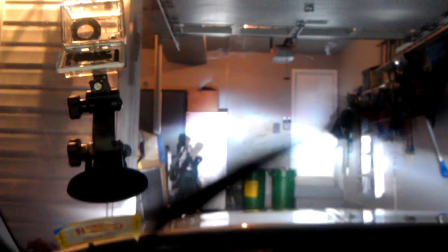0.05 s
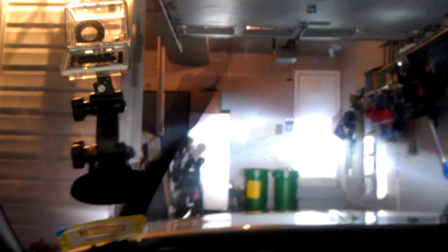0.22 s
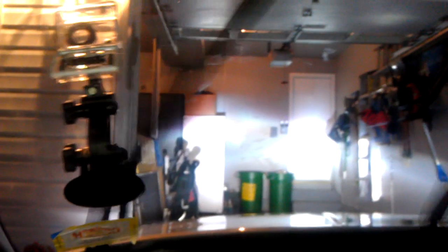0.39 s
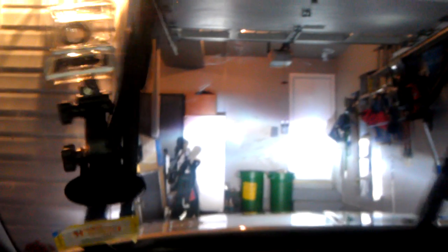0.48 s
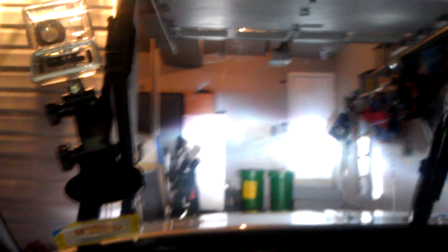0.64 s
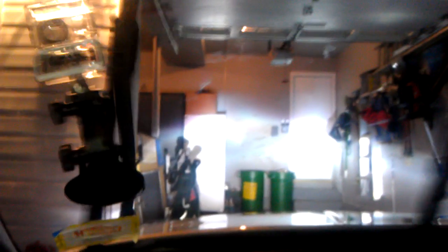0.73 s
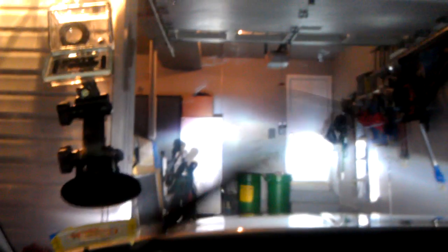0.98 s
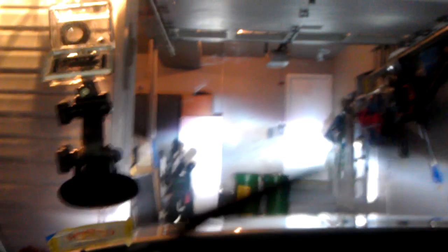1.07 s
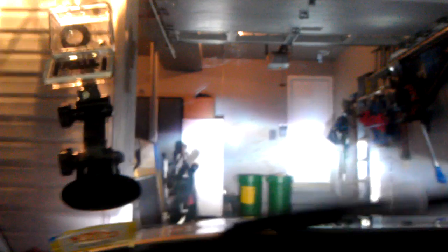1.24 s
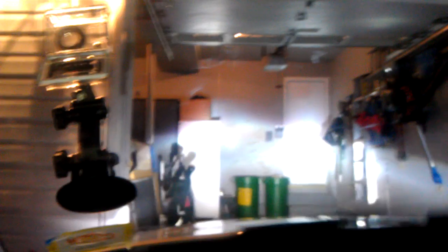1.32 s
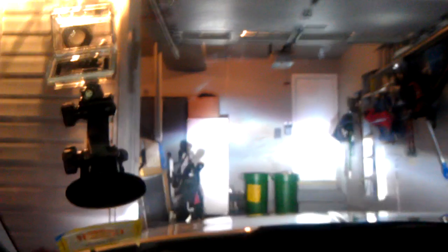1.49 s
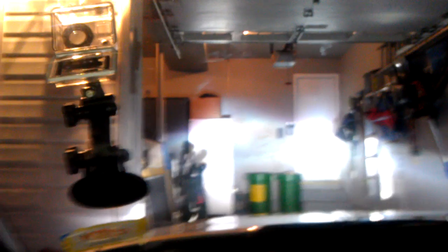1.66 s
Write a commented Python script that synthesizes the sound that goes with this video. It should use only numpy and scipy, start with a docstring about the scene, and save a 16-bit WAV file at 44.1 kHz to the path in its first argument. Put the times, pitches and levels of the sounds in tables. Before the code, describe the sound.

Wiper blade scraping and thumping up and back over a nearly dry windscreen, from inside.

```python
"""Inside a parked car, a windscreen wiper sweeps up and back over nearly dry glass.
The rubber blade catches, judders and scrapes; each slip knocks the screen and booms in the cabin.
The end of the return is smooth: the motor whines over a faint hiss, speeding up until the arm
parks with a soft tap."""
import sys
import numpy as np
from scipy import signal
from scipy.fft import rfft, irfft
from scipy.io import wavfile
from scipy.ndimage import uniform_filter1d

SR = 44100
rng = np.random.default_rng(int(sys.argv[2]) if len(sys.argv) > 2 else 0)


def unload_wav(signal):
    """Save mono or channel-first audio to the path in sys.argv[1] as 16-bit WAV at rate SR, clipped to [-1, 1]."""
    wavfile.write(
        sys.argv[1],
        SR,
        np.round(np.clip(np.atleast_2d(signal).T, -1, 1) * 32767).astype(np.int16),
    )


N = 74970
TIME = np.arange(N) / SR


def amp(db):
    """Decibels to gain."""
    return 10 ** (np.asarray(db) / 20)


def unit(x):
    """Scales to rms 1."""
    return x / np.sqrt(np.mean(x ** 2) + 1e-20)


def read(points, hz):
    """Reads a curve on a log-frequency axis."""
    f, value = np.transpose(points)
    return np.interp(np.log(hz + 1), np.log(f + 1), value)


def add(mix, start_s, sound):
    """Drops a sound into the mix."""
    part = mix[max(round(start_s * SR), 0):][:len(sound)]
    part += sound[:len(part)]


def colour(x, eq):
    """EQs a steady sound, at rms 1."""
    hz = np.fft.rfftfreq(len(x), 1 / SR)
    return unit(irfft(rfft(x) * amp(read(eq, hz)), len(x)))


def wander(length, size):
    """Slow random drift at rms 1."""
    return unit(uniform_filter1d(uniform_filter1d(rng.standard_normal(length), size), size))


# Hiss of the still cabin: freq_hz, gain_db
HISS_EQ = [(15, -18), (25, -21), (76, -7.5), (127, -5), (503, -23.5), (1130, -14.5), (2110, -19),
           (2410, -16), (3520, -20.5), (14400, -18), (16000, -20.5)]
# Electrical tones: pitch_hz, level_db
ELECTRIC_TONES = [(13999, -79), (14883, -76)]


def background():
    """A bed of steady hiss with two very faint, wavering electrical tones."""
    tones = 0
    for pitch_hz, level_db in ELECTRIC_TONES:
        hz = pitch_hz + 3.99 * wander(N, size=400)
        tones += amp(level_db) * np.sqrt(2) * np.sin(2 * np.pi * np.cumsum(hz) / SR)
    return amp(-63.5) * colour(rng.standard_normal(N), HISS_EQ) + tones


# Motor speed and fader: time_s, shaft_hz, gain_db
MOTOR_MOVES = [(0, 52, -51), (.1, 49, -58), (.45, 44, -58), (.62, 46, -53), (.95, 46, -50), (1.1, 52, -56),
               (1.24, 51.3, -55.5), (1.34, 52.7, -52), (1.43, 58, -61), (1.48, 55, -57.5),
               (1.52, 47, -71.5), (1.7, 40, -76.5)]
# Partials of the whine: shaft_multiple, peak_gain_db, peak_shaft_hz, half_width_hz
WHINE_ORDERS = [(2, -15, 49, 3.5), (3, -1.5, 55.25, 2), (4, -12, 24, 4), (7, -22, 54, 1.3),
                (8, -3.5, 58, 3), (16, -16.5, 51.4, 1.4)]
# Rumble of gears and linkage: freq_hz, gain_db
RUMBLE_EQ = [(30, -64), (90, -5.5), (140, -5), (178, 3.5), (240, -4.5), (400, -9.5), (550, -19),
             (1200, -26), (4000, -25), (16000, -55.5)]


def motor():
    """Shaft harmonics swell as the speed sweeps them through resonances, over the gear rumble."""
    time_s, shaft_hz, gain_db = np.transpose(MOTOR_MOVES)
    speed = np.interp(TIME, time_s, shaft_hz)
    wobble = 1 + 0.0069 * wander(N, size=900)
    turn = 2 * np.pi * np.cumsum(speed * wobble) / SR
    whine = 0
    for multiple, peak_db, peak_hz, half_width_hz in WHINE_ORDERS:
        swell = amp(peak_db) / (1 + ((speed - peak_hz) / half_width_hz) ** 2)
        whine += swell * np.sqrt(2) * np.sin(multiple * turn + 2 * np.pi * rng.random())
    rumble = amp(-5) * colour(rng.standard_normal(N), RUMBLE_EQ)
    return amp(np.interp(TIME, time_s, gain_db)) * (whine + rumble)


# Fader ride of the scrape: time_s, level_db
SCRAPE_FADER = [(0, -59), (.19, -62), (.29, -59), (.315, -41.5), (.34, -48.5), (.365, -31.5), (.40, -32),
                (.45, -52.5), (.49, -59), (.65, -65.5), (.675, -54), (.755, -54.5), (.775, -42.5),
                (.85, -34.5), (.90, -72.5), (1.1, -63), (1.42, -63), (1.52, -70)]
# Tone of rubber on glass: freq_hz, gain_db
SCRAPE_EQ = [(40, -20.5), (150, 10.5), (500, 7.5), (1100, 5.5), (1800, 2.5), (3000, 0), (4500, -7.5),
             (7000, -13), (9000, -66.5), (16000, -39.5)]


def scrape(grains_per_s=900):
    """Tiny slips of rubber on glass make a grit, blended with smooth friction noise."""
    grains = (rng.random(N) < grains_per_s / SR) * rng.choice([-1, 1], N)
    grains = grains * amp(-2.5 * np.minimum(rng.exponential(1, N), 4))
    rub = colour(unit(grains) + 0.46 * rng.standard_normal(N), SCRAPE_EQ)
    return rub * amp(np.interp(TIME, *np.transpose(SCRAPE_FADER)))


def snap(t, attack_s=.0008, decay_s=.0025):
    """The rubber lets go: a noise transient, evened out so its spectrum has no deep holes."""
    envelope = np.minimum(t / attack_s, 1) * np.exp(-t / decay_s)
    burst = rng.standard_normal(len(t)) * envelope
    for _ in range(2):
        spectrum = rfft(burst)
        burst = irfft(spectrum / (abs(spectrum) + 1e-12), len(t)) * np.sqrt(envelope)
    return unit(burst) * np.sqrt(np.mean(envelope ** 2))


# Reverb time of the cabin: freq_hz, t60_s
CABIN_DECAY = [(100, 0.4), (260, 0.12), (700, 0.12), (1840, 0.095), (4850, 0.11), (14000, 0.15)]


def cabin_tail(t, attack_s=.0013):
    """A slip scatters round the cabin as noise, the bass lasting longest."""
    hz, time_s, bands = signal.stft(rng.standard_normal(len(t)), SR, nperseg=256)
    decay = 1000 ** (-time_s / read(CABIN_DECAY, hz)[:, None])
    return signal.istft(bands * decay, SR)[1][:len(t)] * (1 - np.exp(-t / attack_s))


# Centres of a knock's thud, body, clack and tick: freq_hz
BAND_HZ = [170, 480, 1300, 4000]
# Resonances of the screen and cabin: pitch_hz, gain_db, t60_s
SCREEN_MODES = [(100, -13.5, 0.21), (129, -34.5, .17), (153, -11, 0.18), (196, 0, 0.2), (207, 4, 0.12),
                (275, -5, 0.11), (316, -1.5, 0.12), (367.9, -11.5, 0.19), (424.6, -0.5, 0.15),
                (550.5, 0.5, 0.11), (586.5, -14.5, 0.28), (690.6, -5, .09), (865, -1.5, 0.069),
                (1236, -3.5, 0.065)]
# Resonances of the blade's steel spine and plastic clips: pitch_hz, gain_db
SPINE_MODES = [(985, -9), (1140, -15.5), (1520, -11.5), (1780, -13.5), (1915, -3.5), (2120, -9),
               (2450, -14.5), (3090, -4), (3480, -6.5), (4030, -29)]


def ring(t, hz, force_db, attack_s=.0027, spine_t60_s=.055):
    """Screen, cabin and spine ring, each mode as hard as the slip drives its pitch."""
    modes = list(SCREEN_MODES) + [(f, db, spine_t60_s) for f, db in SPINE_MODES]
    out = 0
    for pitch_hz, gain_db, t60_s in modes:
        drive = amp(gain_db + np.interp(pitch_hz, hz, force_db))
        out += drive * 1000 ** (-t / t60_s) * np.sin(2 * np.pi * pitch_hz * t)
    return out * (1 - np.exp(-t / attack_s))


def hit_eq(x, db):
    """Minimum-phase EQ, one gain per bin: nothing sounds ahead of the attack."""
    log_gain = np.log(amp(np.maximum(np.r_[db, db[-2:0:-1]], -120)))
    response = np.exp(np.conj(signal.hilbert(log_gain)))[:len(db)]
    return irfft(rfft(x, len(log_gain)) * response)


# Tone of the snap and its tail: freq_hz, gain_db
SCATTER_EQ = [(40, -20), (150, 7.5), (300, 6.5), (550, 0.5), (950, -2.5), (1500, -8), (2400, -11.5),
              (3200, -14.5), (5000, -16), (8000, -20.5), (12000, -19.5), (16000, -25.5)]


def knock(bands_db, size=16384):
    """One slip hits the screen: a snap, a cabin tail and ringing modes."""
    t, hz = np.arange(size) / SR, np.fft.rfftfreq(size, 1 / SR)
    thud_hz, body_hz, _, tick_hz = BAND_HZ
    force_db = read(list(zip(BAND_HZ, bands_db)), hz)
    low_cut_db = 8.5 * np.maximum(np.log2(thud_hz / (hz + 10)) - 1, 0)
    high_cut_db = 12 * np.log2(np.clip(hz, tick_hz, 8600) / tick_hz)
    scatter_db = read(SCATTER_EQ, hz) + 10 * np.log10(SR / 2 / body_hz)
    noise = snap(t) + amp(-9.5) * cabin_tail(t)
    spot_db = 2.5 * wander(len(hz), size=48)  # each spot on the glass has its own colour
    noise = hit_eq(noise, force_db - low_cut_db - high_cut_db + scatter_db + spot_db)
    return noise + amp(-5.5) * ring(t, hz, force_db)


def twang(pitch_hz, gain_db, attack_cycles=.66):
    """The bent rubber and its spine ring for a few cycles; higher is shorter."""
    t = np.arange(0, .15, 1 / SR)
    decay_s = .0063 * (BAND_HZ[1] / pitch_hz) ** .56
    envelope = (1 - np.exp(-pitch_hz * t / attack_cycles)) * np.exp(-t / decay_s)
    return amp(gain_db) * envelope * np.sin(2 * np.pi * pitch_hz * t)


# Slips and slaps of the blade, ending on the parking tap:
# start_s, thud_db, body_db, clack_db, tick_db, twang_hz, twang_db
SLIP_CUES = [(0.2053, -29, -28.5, -34.5, -22.5, 3100, -18.5),
             (0.2080, -27.5, -27.5, -21.5, -19.5, 815, -17.5), (0.213, -25, -21, -32, -33.5, 245, -16.5),
             (0.226, -23, -30, -28.5, -35.5, 115.4, -21), (0.2953, -30.5, -35.5, -35, -36, 985, -25.5),
             (0.309, -31, -35.5, -59.5, -56.5, 240, -35.5), (0.3425, -26.5, -25.5, -20.5, -36.5, 274, -18),
             (0.3573, -37, -29.5, -23, -46, 1170, -31), (0.3669, -16, -24, -13.5, -26.5, 873, -11.5),
             (0.374, -16.5, -16, -10.5, -27.5, 287, -6.5), (0.38, -17.5, -7.5, -20, -30, 450, -14.5),
             (0.3882, -17, -16, -6.5, -27.5, 550, -4.5), (0.3970, -18, -15, -23, -43, 393, -9),
             (0.4119, -17, -33, -23.5, -59, 177, -11), (0.4330, -42.5, -38.5, -52.5, -56.5, 122, -25),
             (0.497, -46.5, -45, -45, -63, 980, -44.5), (0.5530, -35, -27, -36, -43.5, 1220, -29),
             (0.6604, -30, -45.5, -34, -48.5, 384, -27), (0.6636, -28, -40.5, -33, -45.5, 1880, -32.5),
             (0.6992, -61.5, -36, -37, -44.5, 570, -41), (0.7098, -42, -44, -39.5, -41, 1060, -51),
             (0.7374, -33, -36, -37, -43.5, 2050, -38), (0.7613, -20, -21.5, -21, -29, 157, -11),
             (0.7648, -26.5, -26, -37.5, -47, 290, -18.5), (0.7824, -27, -27, -30, -40.5, 2600, -28.5),
             (0.7907, -25, -23.5, -36.5, -39.5, 310, -18.5), (0.8335, -18, -18.5, -15, -19, 2320, -15.5),
             (0.8350, -22, -21, -21, -23.5, 503, -6.5), (0.8380, -25, -25.5, -40, -49.5, 165.7, -11.5),
             (0.85, -36, -20, -40, -42, 407, -6), (0.9450, -42, -51.5, -83, -69, 105, -41.5),
             (1.032, -53.5, -53, -50.5, -46.5, 805, -50), (1.4600, -58, -52, -49.5, -55, 1050, -56)]


def slips():
    """The blade catches and lets go, with a knock and a twang each time."""
    out = np.zeros(N)
    for start_s, *bands_db, twang_hz, twang_db in SLIP_CUES:
        add(out, start_s, knock(bands_db))
        add(out, start_s, twang(twang_hz, twang_db))
    return out


def through_glass(x, thud_lag_s=.003083):
    """Bending waves in glass carry the bass more slowly: the thud lands after the tick."""
    hz = np.fft.rfftfreq(len(x), 1 / SR)
    phase_lag = 4 * np.pi * thud_lag_s * np.sqrt(BAND_HZ[0] * hz)
    return irfft(rfft(x) * np.exp(-1j * phase_lag), len(x))


# Groans of the rubber: start_s, length_s, from_hz, to_hz, level_db, level_change_db
JUDDER_CUES = [(0.671, .058, 177.5, 206, -28, 0.5), (0.765, .07, 175.7, 182.5, -18.5, -6)]


def judders(fade_s=.009, tilt_db_per_octave=-15):
    """The rubber sticks and slips fast enough to groan, in short rising glides."""
    out = np.zeros(N)
    for start_s, length_s, from_hz, to_hz, level_db, change_db in JUDDER_CUES:
        t = np.arange(0, length_s, 1 / SR)
        glide_hz = from_hz + (to_hz - from_hz) * t / length_s
        wobble = 1 + .042 * wander(N, size=200)[:len(t)]
        phase = 2 * np.pi * np.cumsum(glide_hz * wobble) / SR
        groan = sum(amp(tilt_db_per_octave * np.log2(k)) * np.sin(k * phase) for k in range(1, 6))
        fades = np.clip(np.minimum(t, length_s - t) / fade_s, 0, 1)
        add(out, start_s, groan * amp(level_db + change_db * t / length_s) * fades)
    return out


def fizz(peak_s=.806, width_s=.0075, level_db=-38.5):
    """A flick of thin hiss as the blade starts back."""
    high_pass = signal.butter(2, 7000, "high", fs=SR, output="sos")
    hiss = unit(signal.sosfilt(high_pass, rng.standard_normal(N)))
    return hiss * amp(level_db) * np.exp(-abs(TIME - peak_s) / width_s)


def scene():
    """Blade, motor and background, in mono from behind the screen."""
    blade = through_glass(slips() + judders())
    return (blade + scrape() + fizz() + motor() + background())[None]


def reduction(over_db, release_db_per_s):
    """Gain reduction in dB that jumps up and releases at a steady rate."""
    fall = TIME * release_db_per_s
    return np.maximum.accumulate(np.maximum(over_db, 0) + fall) - fall


def smooth(x, seconds):
    """One-pole smoothing."""
    pole = np.exp(-1 / (seconds * SR))
    return signal.lfilter([1 - pole], [1, -pole], x)


def record(dry, duck_above_db=-24, limit_db=-14.3, ceiling=.3, cutoff_hz=16200):
    """Loud knocks duck the mix; a fast limiter and soft clip flatten them, then a low-pass."""
    power_db = 10 * np.log10(smooth(dry[0] ** 2, .015) + 1e-12)
    ducked = dry[0] * amp(-reduction(.45 * (power_db - duck_above_db), release_db_per_s=5))
    peak_db = 20 * np.log10(abs(ducked) + 1e-9)
    limited = ducked * amp(-smooth(reduction(peak_db - limit_db, release_db_per_s=900), .0009))
    clipped = limited / (1 + (limited / ceiling) ** 8) ** (1 / 8)
    low_pass = signal.firwin(511, cutoff_hz, window=("kaiser", 9), fs=SR)
    return signal.oaconvolve(clipped, low_pass, "same")[None]


dry = scene()
out = record(dry)
unload_wav(out)
```